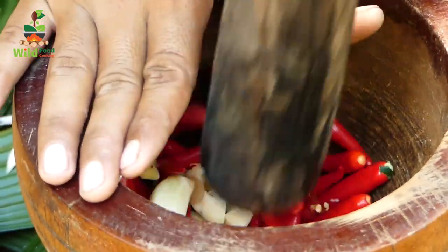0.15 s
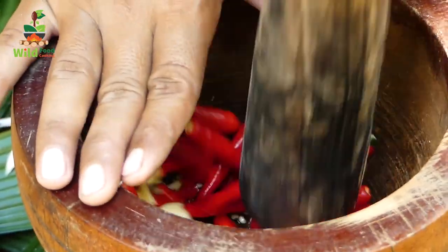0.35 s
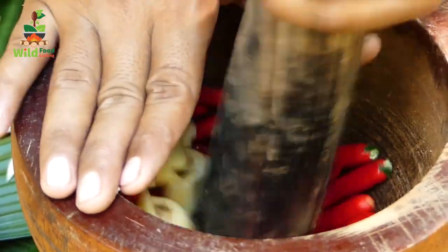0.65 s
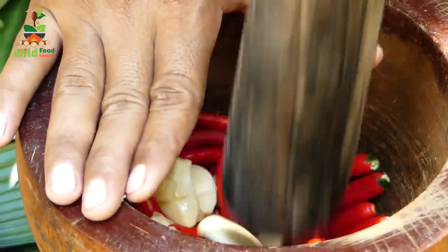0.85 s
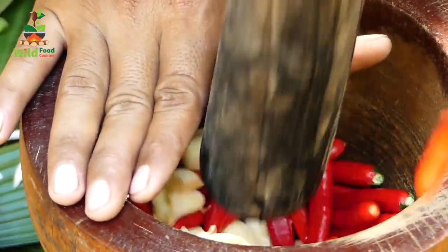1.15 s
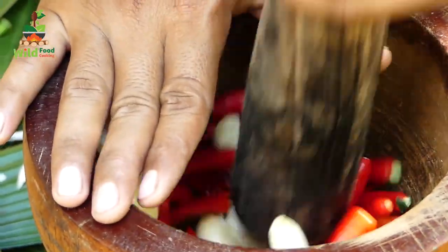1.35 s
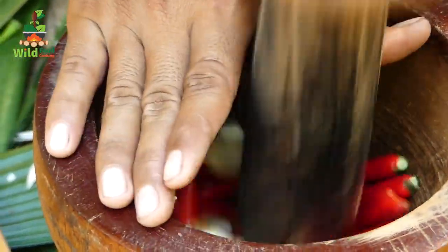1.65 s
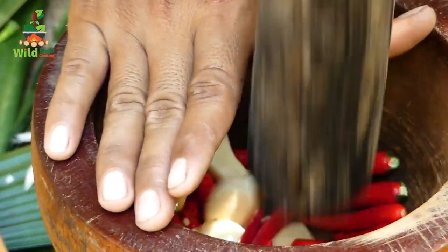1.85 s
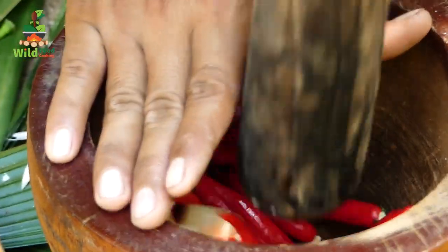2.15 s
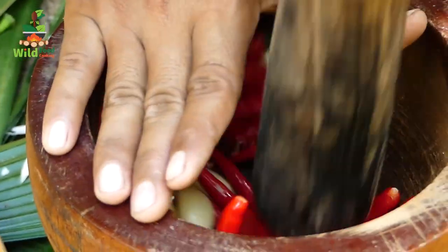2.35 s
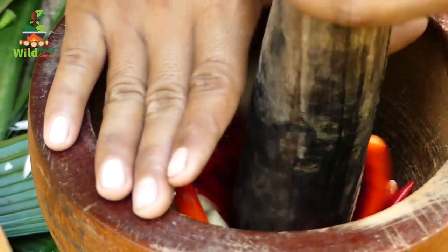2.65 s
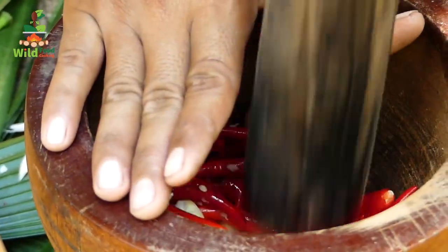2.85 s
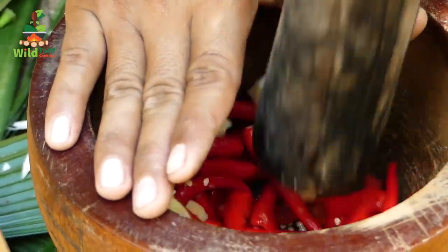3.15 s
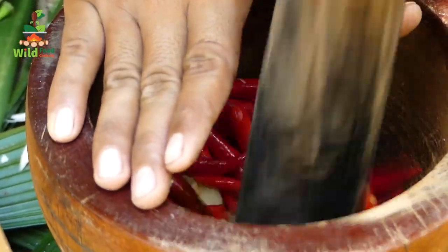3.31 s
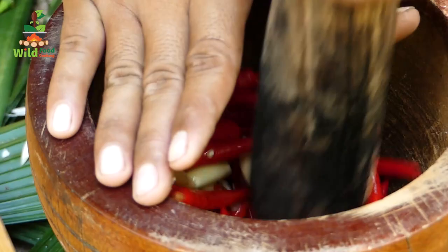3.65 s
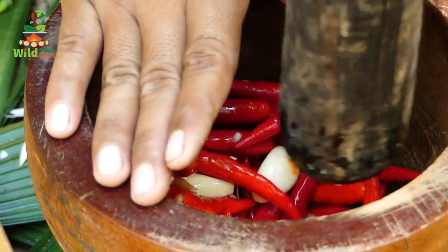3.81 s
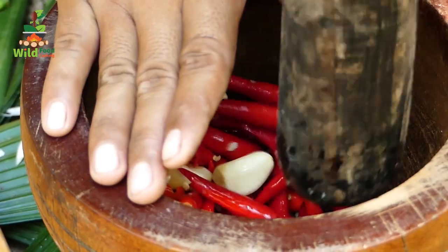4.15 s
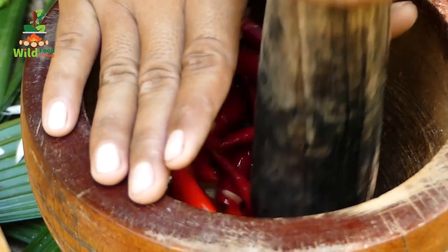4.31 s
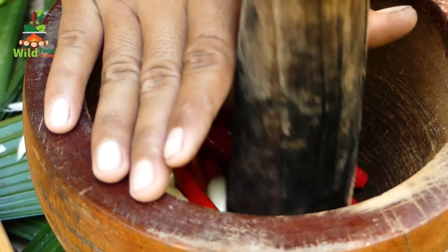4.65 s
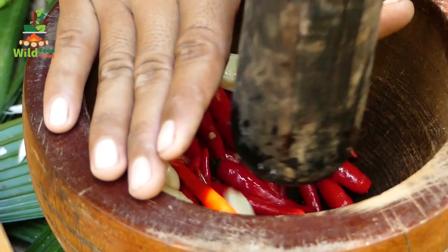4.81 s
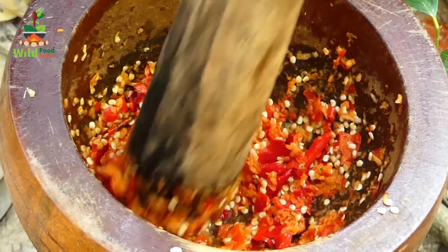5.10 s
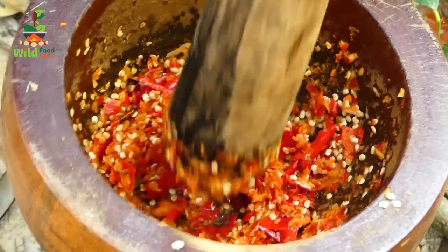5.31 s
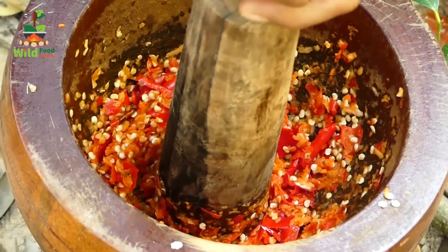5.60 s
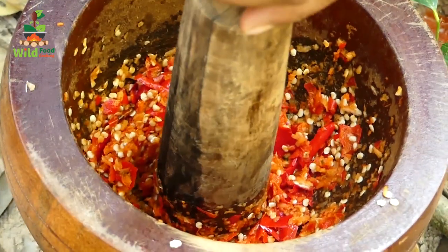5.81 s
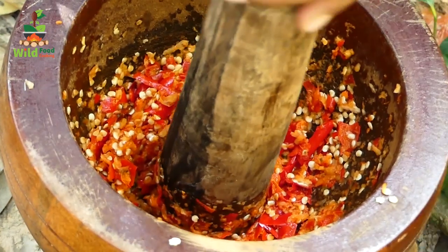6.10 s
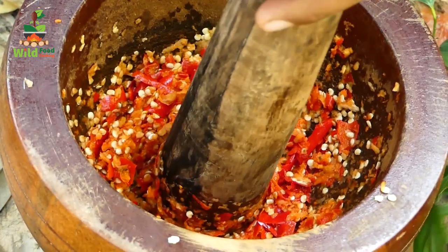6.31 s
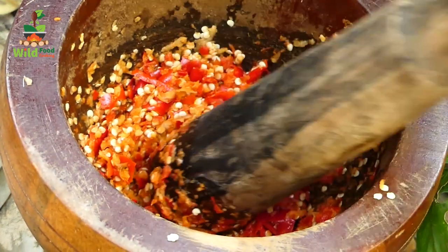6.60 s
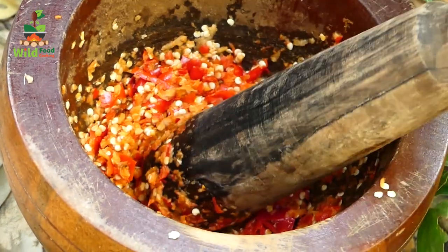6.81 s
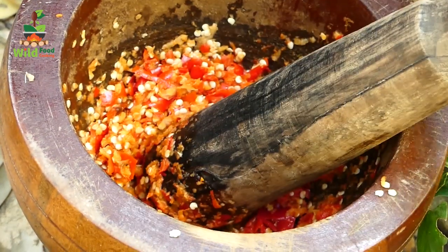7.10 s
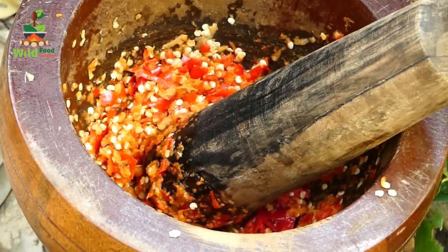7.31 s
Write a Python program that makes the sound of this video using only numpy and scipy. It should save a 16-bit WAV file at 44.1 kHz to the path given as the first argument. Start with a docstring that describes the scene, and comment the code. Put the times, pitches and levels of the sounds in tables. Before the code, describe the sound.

Rapid, evenly spaced wooden pounding crunches moist food in a wooden bowl, then slower blows, a silent gap, one hard crack, and gritty grinding with chirps.

```python
"""A wooden pestle pounds chillies and garlic in a wooden mortar outdoors, in light wind. Each blow sums
crackling grains, a thud with a sharp crack, and the decaying modes of the bowl. The first stretch runs at three
times normal speed, so sounds are shorter and mostly higher; slower blows follow. After a silent gap the pestle
strikes once, then grinds the paste as clumped noise grains, while a small animal chirps in rising tones.
Noise-band insects, snapping seeds, sliding food, air, far rumble and yard echoes complete the scene."""
import sys
import numpy as np
from scipy import signal
from scipy.io import wavfile
from scipy.ndimage import uniform_filter1d

SR = 44100
rng = np.random.default_rng(int(sys.argv[2]) if len(sys.argv) > 2 else 0)


def nominal_scale(level):
    """Amplitude ratio for a level in decibels (scalar or array-like)."""
    x = np.asarray(level, float) / 20
    return 10 ** x


def wrap_up_sound(samples):
    """Save the sound to the file named by the first command line argument, as 16-bit audio."""
    columns = np.atleast_2d(samples).T
    # keep every value between -1 and 1, then stretch to whole-number steps
    tamed = np.clip(columns, -1, 1)
    steps = np.round(tamed * 32767).astype(np.int16)
    wavfile.write(sys.argv[1], SR, steps)


N = 328969

# Silent gap. One row: start in seconds, end in seconds.
GAP = (5.09, 5.409)
# Pestle landing on food. Each row: time in seconds, crunch level in dB, thud level in dB, thud pitch in Hz,
# level of the bowl's ring in dB.
BLOW_ROWS = [(0.0637, -10.5, -47, 404, -49), (0.1726, -16, -37.5, 680, -29),
             (0.2835, -16.5, -41.5, 770, -27), (0.394, -18.5, -49, 403, -20.5),
             (0.5094, -22.5, -37, 750, -33), (0.617, -19.5, -45.5, 406, -30),
             (0.7268, -20, -38.5, 770, -24), (0.839, -10, -32, 760, -25), (0.9489, -19, -52, 570, -21),
             (1.06, -4, -42.5, 574, -43), (1.1712, -3.5, -46.5, 464, -28), (1.283, -14, -29.5, 765, -22),
             (1.407, -21, -45.5, 395, -25), (1.5197, -26, -55, 490, -32), (1.626, -19.5, -52, 402, -35),
             (1.733, -21.5, -44, 674, -29), (1.844, -14.5, -54.5, 277, -25.5),
             (1.9543, -16.5, -64, 365, -32), (2.064, -15.5, -48, 350, -29), (2.1763, -17, -37, 760, -66),
             (2.2847, -19, -52, 486, -45), (2.396, -13, -51.5, 280, -28), (2.5071, -14.5, -35, 747, -26),
             (2.616, -18, -57.5, 392, -31), (2.7215, -17.5, -58, 380, -32.5), (2.835, -16.5, -49, 400, -32),
             (2.948, -16.5, -32, 833, -29.5), (3.057, -17.5, -51, 443, -29.5),
             (3.1734, -24.5, -47, 695, -31), (3.294, -21, -72.5, 250, -36.5), (3.403, -20, -56, 271, -36),
             (3.5144, -13.5, -41, 650, -34.5), (3.6457, -22.5, -65.5, 159, -68),
             (3.952, -20, -41.5, 302, -45), (3.9646, -31, -48, 900, -38), (3.976, -25.5, -56.5, 145, -43),
             (4.2896, -14.5, -31, 336, -7), (4.309, -23.5, -57, 292, -44), (4.622, -10, -54, 192, -41),
             (4.6295, -53, -49, 253, -52), (4.9435, -32, -39.5, 720, -38), (4.9508, -12, -43.5, 300, -55),
             (5.4882, 8.5, -13, 647, -20)]
# Turning pestle bumping the bowl wall. Each row: time in seconds, scuff level in dB, thud level in dB,
# thud pitch in Hz.
BUMP_ROWS = [(6.123, -23, -48.5, 258), (6.1767, -11, -43, 553), (6.6886, -31, -39.5, 560),
             (7.1292, -47, -53.5, 290), (7.155, -43, -53, 300), (7.3772, -48, -51, 315)]
# Food crackling before the pestle lands. Each row: start in seconds, relative level in dB.
TOUCH_ROWS = [(.165, -39.5), (0.5, -40.5), (0.612, -37), (0.945, -47), (1.053, -37.5), (1.2762, -39),
              (1.401, -39.5), (1.514, -36.5), (1.8412, -41), (2.827, -41), (3.944, -45), (4.277, -43),
              (4.608, -57), (4.936, -43), (5.4835, -33)]
# Modes of the bowl at normal speed. Each row: frequency in Hz, relative level in dB, 60 dB decay in seconds
# when undamped.
BOWL_MODES = [(576, 0, .042), (775, -14, .11), (930, -7, .018), (1180, -4, .018), (1378, -6, .033),
              (1740, -15, .018), (2450, -13, .02)]
# Modes of the crack on the bottom at normal speed. Each row: frequency in Hz, relative level in dB,
# 60 dB decay in seconds.
CRACK_MODES = [(980, 15.5, 0.011), (1250, 10.5, .011), (1500, 4, 0.009), (2510, 12.5, 0.0093),
               (3244, -1.5, 0.0078), (4130, 9.5, 0.0069), (5200, -0.5, 0.006), (7250, 10, 0.0044),
               (12100, 4.5, .004), (14500, 7, .004)]
# Seeds and skins that snap. Each row: time in seconds, level in dB, pitch in Hz.
SNAP_ROWS = [(0.9907, -21, 11200), (1.308, -35.5, 8850), (1.362, -36, 8700), (2.2938, -22.5, 9600),
             (2.8412, -22.5, 11100), (3.2761, -22.5, 11800), (4.49, -44, 6950), (4.794, -41.5, 8230),
             (6.0906, -30.5, 7900), (6.1047, -31, 9500), (6.147, -36, 8000), (6.1937, -25.5, 1900),
             (6.2157, -30, 3000), (6.622, -38, 8500), (6.638, -29, 4540), (6.6425, -37, 1300),
             (6.4515, -26.5, 7500), (7.361, -25, 7970), (7.3802, -32.5, 1010), (7.412, -30, 7950),
             (7.427, -25, 7360)]
# Spectrum of crushed food at normal speed. Each row: frequency in Hz, relative density in dB.
CRUNCH_SPECTRUM = [(120, -17), (200, -6.5), (330, -3), (450, -15.5), (600, -3), (1250, -7), (1940, -2.5),
                   (4680, -6.5), (16000, -11.5)]
# Spectrum of dragged paste. Each row: frequency in Hz, relative density in dB.
PASTE_SPECTRUM = [(120, -12.5), (400, -2), (630, -8), (1300, -2.5), (2200, -9.5), (4200, -8.5), (6000, -15),
                  (8300, -8.5), (9500, -17), (15500, -15.5)]
# Pestle dragging through paste. Each row: time of most pressure in seconds, relative level in dB,
# rise in seconds per 20 dB, fall in seconds per 20 dB.
STROKE_ROWS = [(5.866, -47.5, 0.071, 0.085), (6.131, -38, 0.17, 0.043), (6.176, -31.5, 0.029, 0.06),
               (6.271, -57.5, 0.07, 0.72), (6.636, -33.5, 0.09, 0.057), (6.698, -42, 0.054, 0.052),
               (7.18, -50, 0.06, 0.056), (7.4, -51.5, 0.19, 0.41)]
# Coarse, middle and fine grit. Each row: low edge in Hz, high edge in Hz.
GRIT_BANDS = [(60, 1800), (1800, 6000), (6000, 18000)]
# Animal calls. Each row: start in seconds, level in dB, top pitch in Hz, time in seconds until the fade.
CHIRP_ROWS = [(5.246, -38, 5700, .02), (5.884, -32.5, 5700, 0.017), (6.359, -35.5, 5680, 0.027),
              (6.891, -34.5, 5700, 0.019), (7.352, -29.5, 5776, 0.023)]
# Insect songs and, in the last row, a faint hiss after the bare strike. Each row: start in seconds,
# end in seconds, carrier in Hz, nominal width in Hz, level in dB.
BAND_ROWS = [(4.09, 4.27, 5760, 45, -66), (4.81, 5.0, 6700, 1046, -67), (4.55, 4.8, 8600, 700, -70),
             (5.5, 5.69, 5250, 600, -68)]
# Spectrum of the air at normal speed. Each row: frequency in Hz, relative density in dB.
AIR_SPECTRUM = [(150, -36), (250, 0), (1080, -8.5), (1730, -10.5), (2760, -15), (14400, -25), (16000, -30)]
# Air level before its flicker. Each row: time in seconds, level in dB.
AIR_LEVEL = [(0, -66), (5.1, -65.5), (5.4, -59), (7.46, -60)]
# Spectrum of far traffic at normal speed. Each row: frequency in Hz, relative density in dB.
RUMBLE_SPECTRUM = [(35, -17), (60, -3.5), (120, -6.5), (250, -18.5), (500, -39.5)]
# Spectrum of wind on the microphone at normal speed. Each row: frequency in Hz, relative density in dB.
WIND_SPECTRUM = [(5, -22.5), (10, 8), (17, 0), (30, -15), (45, -18.5), (80, -53)]
# Wind strength. Each row: time in seconds, level in dB.
WIND_LEVEL = [(0, -47.5), (5.1, -46.5), (5.4, -40), (6.0, -36.5), (6.25, -31), (6.5, -42.5), (7.46, -38.5)]
# Decay of the yard at normal speed. Each row: frequency in Hz, 60 dB decay in seconds.
YARD_DECAY = [(200, 0.7), (700, 0.21), (1400, 0.56), (3000, 0.15), (5700, 0.61), (12000, 0.2)]
# Faint side signal before patches are removed. Each row: frequency in Hz, side over its source in dB.
SIDE_LEVEL = [(40, -49.5), (250, -23), (1000, -20), (12000, -14.5)]
# Band limit. Each row: frequency in Hz, linear gain.
BAND_LIMIT = [(0, 1), (15600, 1), (15850, .04), (16850, 0), (SR / 2, 0)]

FAST, FAST_UNTIL_S = 3, 3.63  # speed factor, and the second at which it returns to 1
T = np.arange(N) / SR
SPEED = np.where(T < FAST_UNTIL_S, FAST, 1)


def speed_at(s):
    """Time scaling: the speed factor at second s, which shortens an event starting there."""
    return FAST if s < FAST_UNTIL_S else 1


def evened(x):
    """Normalization: equal mean power, scaled to rms 1."""
    return x / np.sqrt(np.mean(x ** 2) + 1e-20)


def read(points, hz):
    """Interpolation: a spectrum is taken as straight on a log-frequency axis."""
    f, value = np.transpose(points)
    return np.interp(np.log(hz + 1), np.log(f + 1), value)


def along(rows):
    """Envelope: a level curve in dB becomes a gain at every sample."""
    return nominal_scale(np.interp(T, *np.transpose(rows), left=-150))


def add(mix, s, sound):
    """Superposition: mixes a sound in place from second s."""
    part = mix[round(s * SR):][:len(sound)]
    part += sound[:len(part)]


def coloured(x, points, speed=1):
    """Minimum-phase filtering: unit energy, with the spectrum stretched upward by the speed factor."""
    hz = abs(np.fft.fftfreq(16384, 1 / SR)) / speed
    log_gain = np.log(nominal_scale(np.maximum(read(points, hz), -100)))
    taps = np.fft.ifft(np.exp(np.conj(signal.hilbert(log_gain)))).real[:8192]
    return signal.oaconvolve(x, taps / np.linalg.norm(taps))[:N]


def at_speed(x, points):
    """Frequency scaling: colours each stretch for its own speed."""
    return coloured(x * (SPEED > 1), points, FAST) + coloured(x * (SPEED == 1), points)


def grains(per_s, spread_db, hiss):
    """Shot noise: random impulses of random size and sign over continuous noise."""
    size = nominal_scale(spread_db * np.minimum(rng.exponential(1, N), 4))
    size = size * (rng.random(N) < per_s * SPEED / SR)
    clicks = evened(size * rng.standard_normal(N))
    return evened(clicks + hiss * rng.standard_normal(N))


def popped(x):
    """Resonance: each grain excites one short resonator, so a crunch is a cluster of pitched pops."""
    pop_hz = np.geomspace(250, 16000, 16)
    pitch = rng.integers(0, len(pop_hz), N)
    out = np.zeros(N)
    for k, hz in enumerate(pop_hz):
        out += signal.lfilter(*signal.iirpeak(hz, 4, fs=SR), x * (pitch == k))
    return 3 * out


def dying(hz, t60, t, rise_s):
    """Damped oscillation: contact brings a mode up with time constant rise_s, then it decays."""
    return (1 - np.exp(-t / rise_s)) * nominal_scale(-60 * t / t60) * np.sin(2 * np.pi * hz * t)


def air():
    """Broadband turbulence: flickering outdoor hiss, far traffic rumble and wind on the microphone."""
    flicker = nominal_scale(2.8 * evened(uniform_filter1d(rng.standard_normal(N), 900)))
    hiss = at_speed(rng.standard_normal(N) * flicker * along(AIR_LEVEL), AIR_SPECTRUM)
    rumble = at_speed(rng.standard_normal(N) * nominal_scale(-60), RUMBLE_SPECTRUM)
    wind = at_speed(rng.standard_normal(N) * along(WIND_LEVEL), WIND_SPECTRUM)
    return hiss + rumble + wind


def rattle():
    """Modal response: loose cloves and the lifting pestle graze the bowl, which hums until the gap."""
    grazes = grains(40, 2.5, .8) * (T < GAP[0])
    t, out = np.arange(SR // 8) / SR, np.zeros(N)
    for speed, db in [(FAST, -68), (1, -73)]:
        hum = np.zeros(len(t))
        for hz, mode_db, t60 in BOWL_MODES:
            hum += nominal_scale(2.2 * mode_db) * dying(hz * speed, t60 / speed, t, .002 / speed)
        hum /= np.linalg.norm(hum)
        out += nominal_scale(db) * signal.oaconvolve(grazes * (SPEED == speed), hum)[:N]
    return out


def contacts():
    """Impact duration: a harder crunch decays faster; appends ring level and decay where needed."""
    # at 0 dB and normal speed the crunch decays in 0.016 s, half as long for each 8.5 dB more
    hits = [(*row, 0.016 * 2 ** (-row[1] / 8.5)) for row in BLOW_ROWS]
    # a bump rings 4 dB under its thud setting and its scuff decays in 0.022 s
    return hits + [(*row, row[2] - 4, .022) for row in BUMP_ROWS]


def crushing(hits):
    """Fracture and viscous flow: food crackles under rising pressure, then squelches as it yields."""
    crush, squelch = np.zeros((2, N))
    t, lead_s = np.arange(SR // 6) / SR, .04
    for s, crunch_db, _, _, _, t60 in hits:
        # decay times from the pressure peak, 2 ms after the contact time
        u = (t - lead_s - .002) / np.clip(t60 / speed_at(s), .004, .05)
        pressure_db = 60 * np.where(u < 0, u / 0.65, -u)
        add(crush, s - lead_s, nominal_scale(crunch_db - 12 + pressure_db))
        add(squelch, s - lead_s, nominal_scale(crunch_db - 32 - 60 * u / 3.8) * (u > 0))
    for s, db in TOUCH_ROWS:
        # the crackle grows until just after the next blow lands
        sinking_s = min(blow[0] for blow in BLOW_ROWS if blow[0] > s) + 0.004 - s
        add(crush, s, nominal_scale(db + np.linspace(-7, 5, round(sinking_s * SR))))
    crackle = popped(crush * grains(6500, 2.5, 0.11))
    return at_speed(crackle + squelch * grains(2000, 0.88, 1.1), CRUNCH_SPECTRUM)


def knocking(hits):
    """Impact excitation: a low thud and a cluster of high crack modes, both softened by food."""
    wood, t = np.zeros(N), np.arange(SR // 6) / SR
    for s, _, thud_db, thud_hz, ring_db, _ in hits:
        speed = speed_at(s)
        cushion = thud_db < -20  # a stronger thud strikes bare wood
        thud = dying(thud_hz, 10 / thud_hz, t, 0.00057 / speed)
        # food adds a deeper, slower mode
        thud += cushion * nominal_scale(-6.0) * dying(0.6 * thud_hz, 12 / thud_hz, t, 0.0062 / speed)
        add(wood, s + 0.0025 / speed, -nominal_scale(thud_db + 16) * thud)
        crack = np.zeros(SR // 20)
        for hz, db, t60 in CRACK_MODES:
            if hz * speed < SR / 2:
                crack += nominal_scale(db) * dying(hz * speed, t60 / speed, t[:SR // 20], 0.00072 / speed)
        crack_db = max(thud_db, ring_db - 19.5) + 1.5 - 16 * cushion
        add(wood, s + 0.00074 / speed, nominal_scale(crack_db) * crack)
    return wood


def ringing(hits):
    """Modal vibration: each contact spot weighs and bends the bowl's modes, and food damps them."""
    bowl, t = np.zeros(N), np.arange(SR // 6) / SR
    spots = rng.uniform(-1, 1, (len(hits), len(BOWL_MODES), 2)) * [2, .008]  # dB, fraction of pitch
    for (s, _, _, _, ring_db, _), spot in zip(hits, spots):
        speed = speed_at(s)
        # food between pestle and bowl shortens the ring
        longest_s = .05 if ring_db < -20 or s > GAP[1] else 1
        for (hz, db, t60), (more_db, bend) in zip(BOWL_MODES, spot):
            mode = dying(hz * speed * (1 + bend), min(t60, longest_s) / speed, t, 0.0033 / speed)
            add(bowl, s, nominal_scale(ring_db + 4 + db + more_db) * mode)
    return bowl


def yard(x, speed):
    """Reverberation: scattered echoes from ground, walls and trees decay at a rate set by frequency."""
    starts = np.arange(200 // speed, SR - 20, 20)
    taps = np.zeros(SR)
    taps[starts + rng.integers(0, 20, len(starts))] = 1
    hz, t, z = signal.stft(taps * rng.choice([-1., 1.], SR), SR, nperseg=256)
    t60 = read(YARD_DECAY, hz / speed)[:, None] / speed
    tail = signal.istft(z * nominal_scale(-60 * t / t60), SR, nperseg=256)[1]
    return signal.fftconvolve(x, tail / np.linalg.norm(tail))[:N]


def slumping():
    """Granular flow: after each blow food slides back with a soft rustle and tiny ticks, until the gap."""
    level = np.zeros(N)
    chances = rng.uniform(-0.63, 1, (len(BLOW_ROWS), 3))
    for (s, *_), (late, long, db) in zip(BLOW_ROWS, chances):
        speed = speed_at(s)
        swell = np.hanning(round((0.13 + .05 * long) * SR / speed))
        add(level, s + (0.11 + 0.17 * late) / speed, nominal_scale(-63.0 + 4.8 * db) * swell)
    return at_speed(level * grains(45, 4.5, .9), CRUNCH_SPECTRUM) * (T < GAP[0])


def snaps():
    """Brittle fracture: each snap releases a brief damped mode and a little decaying noise."""
    out, t = np.zeros(N), np.arange(300) / SR
    for s, db, hz in SNAP_ROWS:
        fuzz = 0.5 * rng.standard_normal(300) * nominal_scale(-60 * t / 0.012)
        add(out, s, nominal_scale(db) * (dying(hz, 0.0015 + 6 / hz, t, .00005) + fuzz))
    return out


def insects_and_hiss():
    """Quadrature modulation: slow noise around a carrier gives thin whistles, wide buzzes and a faint hiss."""
    out = np.zeros(N)
    for start_s, end_s, hz, width_hz, db in BAND_ROWS:
        t = np.arange(0, end_s - start_s, 1 / SR)
        lowpass = signal.butter(3, width_hz / 2 + 20, fs=SR, output="sos")
        slow = signal.sosfilt(lowpass, rng.standard_normal((2, SR // 2)))[:, -len(t):]
        phase = 2 * np.pi * hz * t
        band = evened(slow[0] * np.cos(phase) + slow[1] * np.sin(phase))
        tone = np.sin(phase) * 40 / width_hz  # narrow bands are nearer to a pure tone
        add(out, start_s, nominal_scale(db) * evened(band + tone) * signal.windows.tukey(len(t), .12))
    return out


def grinding():
    """Stick-slip friction: dense slips and seed grains under pressure, clumped by grit size."""
    pressure = np.zeros(N)
    for s, db, rise_s, fall_s in STROKE_ROWS:
        pressure += nominal_scale(db - 20 * np.maximum((s - T) / rise_s, (T - s) / fall_s))
    shared = evened(uniform_filter1d(rng.standard_normal(N), 250))
    slips = np.zeros(N)
    for band in GRIT_BANDS:
        own = evened(uniform_filter1d(rng.standard_normal(N), 300))
        clumps = nominal_scale(2.2 * shared + 2.2 * own)
        bandpass = signal.butter(2, band, "bandpass", fs=SR, output="sos")
        slips += signal.sosfilt(bandpass, evened(clumps * grains(4500, 2.0, .55)))
    seeds = popped(grains(2200, 2.6, 0.07))
    return pressure * coloured(slips + 1.1 * seeds, PASTE_SPECTRUM)


def chirps():
    """Frequency modulation: a short whistle climbs exponentially to its top, swells, holds and fades."""
    out, t = np.zeros(N), np.arange(0, .06, 1 / SR)
    for s, db, top_hz, length_s in CHIRP_ROWS:
        hz = top_hz - 520 * np.exp(-t / 0.0042)  # starts 520 Hz under the top
        tone = np.sin(2 * np.pi * np.cumsum(hz) / SR)
        swell = 1 - np.exp(-(t / .006) ** 2)
        fade = np.exp(-np.maximum(t - length_s, 0) / 0.0027)
        add(out, s, nominal_scale(db) * tone * swell * fade)
    return out


def flickering_side(x):
    """Phase randomization: a faint side signal flickers in patches of frequency and time."""
    hz, _, z = signal.stft(x, SR, nperseg=256)
    patches = rng.random((len(z[0]) // 8 + 1, 17)) < .5
    z = z * np.kron(patches, np.ones((8, 8))).T[:len(z), :len(z[0])]
    turn = np.exp(2j * np.pi * rng.random(z.shape))
    return signal.istft(z * nominal_scale(read(SIDE_LEVEL, hz))[:, None] * turn, SR, nperseg=256)[1][:N]


def scene():
    """Superposition: one nearly mono mix, with a faint flickering side signal that is weak in wood."""
    hits = contacts()
    knock, ring, song = knocking(hits), ringing(hits), chirps()
    wood = knock + ring + rattle()
    food = crushing(hits) + snaps() + slumping() + grinding()
    # the knocks and all food layers share one send; the far singer gets a stronger send, about 6 dB under its
    # direct sound
    sent = nominal_scale(-27.5) * ring + nominal_scale(-35) * (knock + food) + nominal_scale(-6.0) * song
    echoes = yard(sent * (SPEED > 1), FAST) + yard(sent * (SPEED == 1), 1)
    mid = wood + food + song + insects_and_hiss() + air() + echoes
    side = flickering_side(mid - 1.2 * wood)
    return np.array([mid + side, mid - side])


def band_limit(x):
    """A steep low-pass at the top of the band."""
    return signal.sosfilt(signal.butter(12, 16830, fs=SR, output="sos"), x)


def record(dry):
    """Saturation and band limiting: peaks clip, a filter removes the top, and the gap is muted."""
    clipped = np.clip(dry, -.94, .94)
    lowpass = signal.firwin2(511, *np.transpose(BAND_LIMIT), fs=SR)
    limited = signal.oaconvolve(clipped, lowpass[None], "same")
    muted = limited * ((T < GAP[0]) | (T > GAP[1]))
    return band_limit(muted)


dry = scene()
out = record(dry)
wrap_up_sound(out)
```